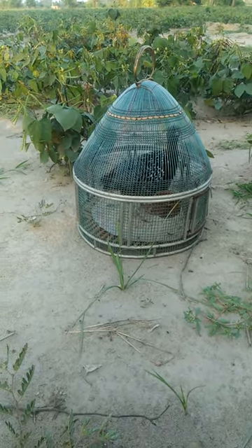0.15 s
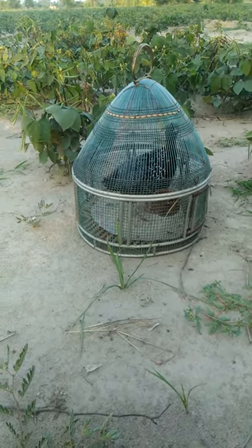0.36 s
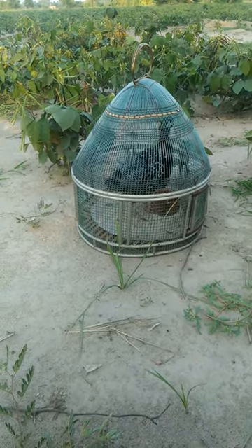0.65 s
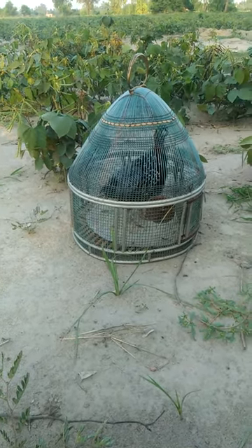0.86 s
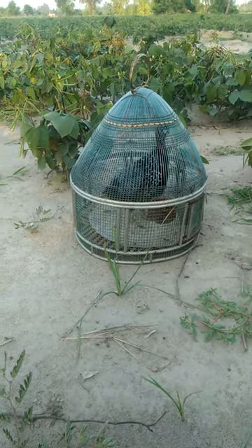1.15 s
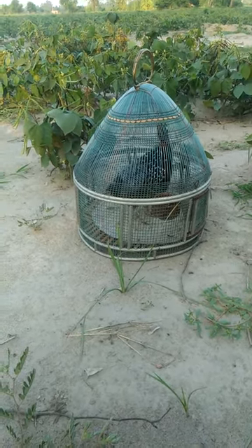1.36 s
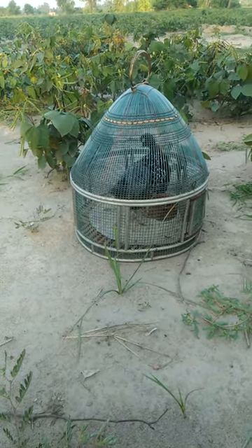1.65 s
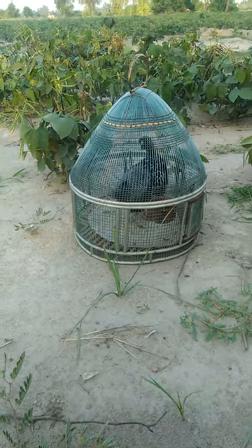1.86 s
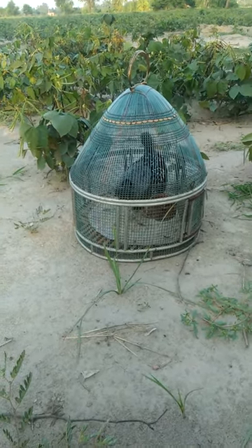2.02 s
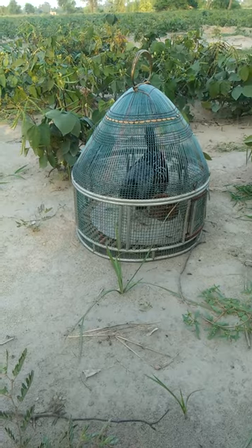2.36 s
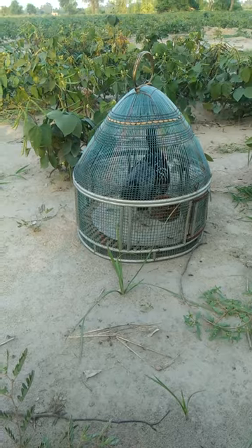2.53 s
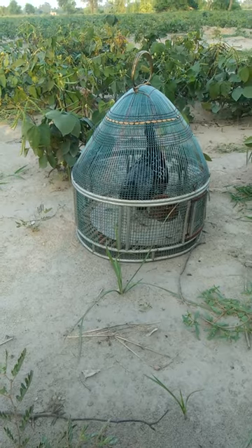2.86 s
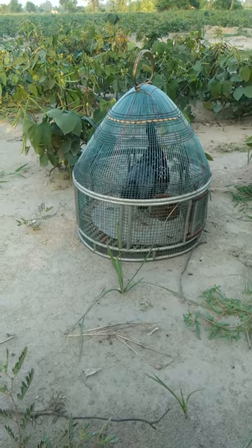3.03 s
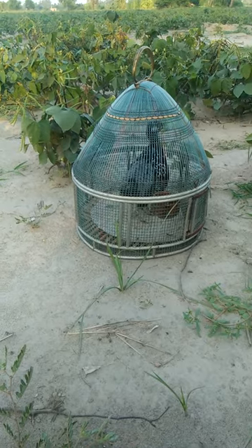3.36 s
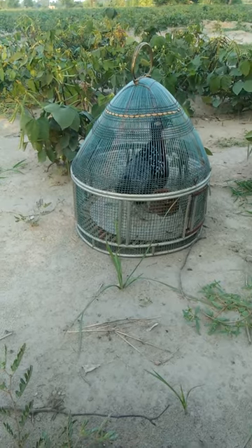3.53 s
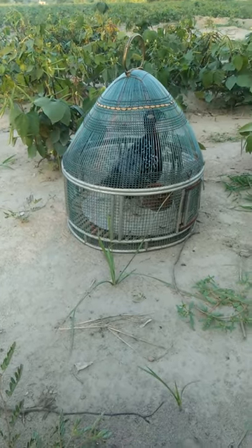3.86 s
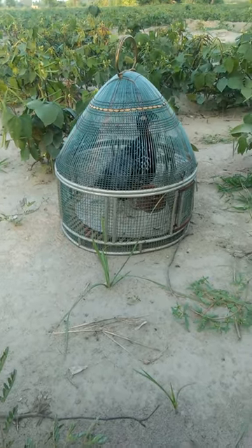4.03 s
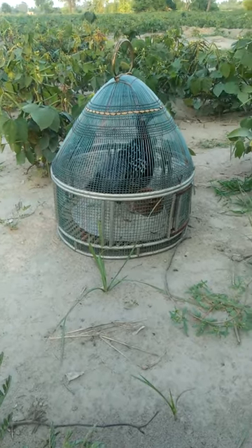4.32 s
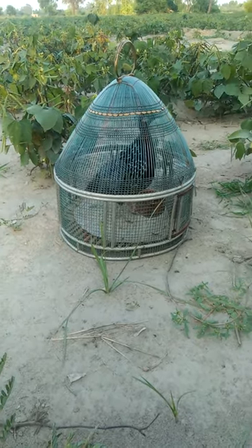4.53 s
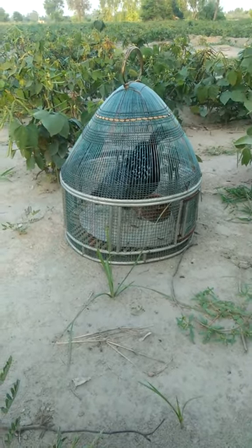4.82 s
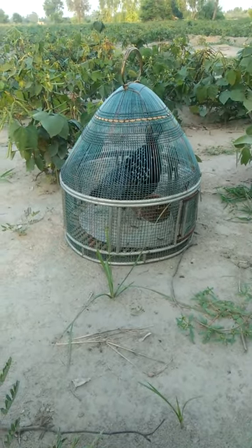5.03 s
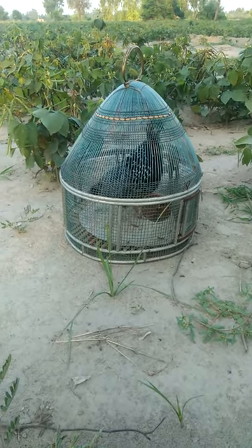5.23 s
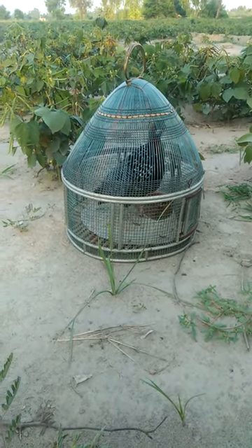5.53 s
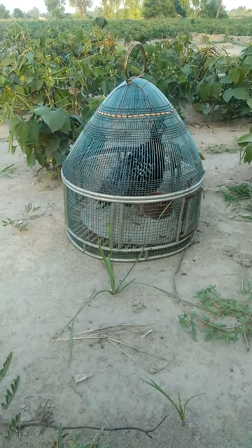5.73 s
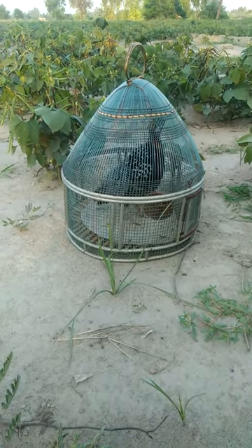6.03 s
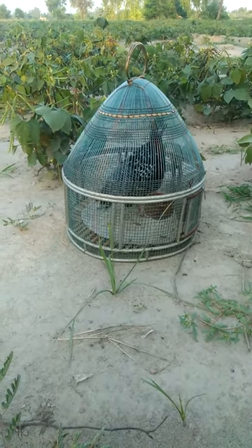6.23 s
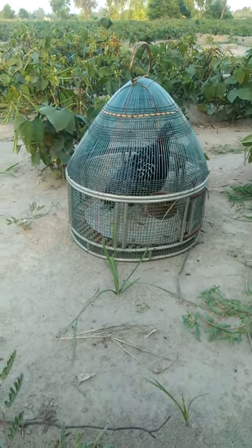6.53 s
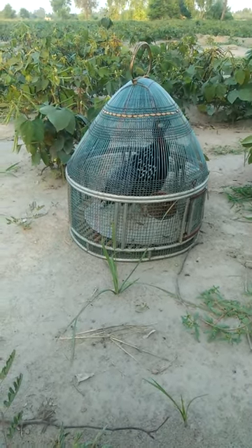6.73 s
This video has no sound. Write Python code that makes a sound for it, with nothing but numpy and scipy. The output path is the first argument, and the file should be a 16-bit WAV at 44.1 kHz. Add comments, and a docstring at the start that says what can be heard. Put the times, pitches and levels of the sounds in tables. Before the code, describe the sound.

Nearly five seconds of soft wind, far cawing and bird peeps, then a very loud raspy game-bird call with brief piercing whistles inside it.

```python
"""A francolin calls near a hand-held phone in an open field: a chik, then four grating notes, two broken by a
whistle. The grating is a train of membrane snaps that rings the throat; the whistle is a near sine with its
octave. Far off a rival calls as throat-filtered noise, crows caw by slow pulses, and small birds and the
rival's faint high whistles pipe as narrow-band noise. Shaped noise makes wind, hiss and rustles; decaying low
sines make handling thuds; sparse echoes answer the near bird."""
import sys
import numpy as np
from scipy import signal
from scipy.fft import rfft, irfft
from scipy.io import wavfile
from scipy.ndimage import uniform_filter1d, minimum_filter1d

SR = 44100
rng = np.random.default_rng(int(sys.argv[2]) if len(sys.argv) > 2 else 0)


def store_wav(level_fs):
    """Save 16-bit WAV to argv[1]."""
    pcm = np.round(np.clip(np.atleast_2d(level_fs), -1, 1) * 32767)
    wavfile.write(sys.argv[1], SR, pcm.T.astype(np.int16))


def makeup_ratio(level_db):
    """Linear amplitude ratio for a level in decibels (20 dB per factor of ten)."""
    decades = np.asarray(level_db, float) / 20
    return 10 ** decades


N = 303408


def evened(x):
    """Normalisation: scales a signal to rms 1."""
    return x / np.sqrt(np.mean(x ** 2) + 1e-20)


def add(mix, s, sound):
    """Superposition: adds a sound to the mix from time s."""
    part = mix[round(s * SR):][:len(sound)]
    part += sound[:len(part)]


def curves(rows):
    """Linear interpolation: start time and one sample-by-sample curve per column after the time."""
    s, *columns = np.transpose(rows)
    t = np.arange(s[0], s[-1], 1 / SR)
    return s[0], [np.interp(t, s, c) for c in columns]


def ramp(t, length):
    """Linear envelope: falls from 1 at t = 0 to 0 after length."""
    return np.clip(1 - t / length, 0, 1)


def coloured(x, points):
    """Spectral filtering: weights x by a curve of (Hz, dB), interpolated over log frequency."""
    hz, db = np.transpose(points)
    f = np.fft.rfftfreq(len(x), 1 / SR)
    gain_db = np.interp(np.log(f + 1), np.log(hz), db)
    return irfft(rfft(x) * makeup_ratio(gain_db), len(x))


def resonate(x, hz, width):
    """Resonance by heterodyne: shifts the curve hz to zero, smooths twice, shifts back; rms 1."""
    turn = np.exp(2j * np.pi * np.cumsum(hz * np.ones(len(x))) / SR)
    r = np.exp(-np.pi * width / SR)
    smoothed = signal.lfilter([1], np.convolve([1, -r], [1, -r]), x / turn)
    return evened((turn * smoothed).real)


def wander(count, size):
    """Slow random modulation: noise averaged over size samples, at rms 1."""
    return evened(uniform_filter1d(rng.standard_normal(count), size))


def pulses(rate, rough, jitter, puff):
    """Pulsed source: snaps at a wavering rate, blended with noise that weakens within each cycle."""
    turns = np.cumsum(rate * (1 + jitter * wander(count=len(rate), size=400))) / SR
    snaps = np.diff(np.floor(turns), prepend=0)
    puffs = (0.87 + np.exp(-(turns % 1) / puff)) * rng.standard_normal(len(rate))
    return np.sqrt(1 - rough) * evened(snaps) + np.sqrt(rough) * evened(puffs)


# Wind on the microphone. Each row: time in seconds, mean level in dB.
WIND = [(0, -56.5), (.25, -69), (1.0, -64), (1.45, -73.5), (1.7, -61), (2.7, -62.5), (3.54, -77),
        (3.95, -61.5), (4.2, -77.5), (4.7, -61.5), (5.05, -65), (5.55, -70), (5.959, -60.5), (6.2, -70),
        (6.88, -65)]
# Spectrum of the wind. Each row: frequency in Hz, relative density in dB per Hz.
WIND_COLOUR = [(12, -60), (20, -13.5), (60, 6.5), (231, -40), (274, -22.5), (370, -33.5), (433, -43.5),
               (600, -38), (780, -67.5), (1320, -120)]
# Spectrum of the field's hiss. Each row: frequency in Hz, relative density in dB per Hz.
HISS_COLOUR = [(59, -32), (100, 1.5), (217, -15.5), (304, -8), (383, -25), (434, -11.5), (513, -18.5),
               (1770, -18), (3180, -31), (6760, -35.5), (8170, -27), (13500, -42), (15000, -43.5)]


def air():
    """Turbulent noise: lumpy low wind on the microphone over the quiet hiss of the field."""
    s, db = np.transpose(WIND)
    gusts_db = np.interp(np.arange(N) / SR, s, db) + 4 * wander(count=N, size=2500)
    wind = evened(coloured(rng.standard_normal(N), WIND_COLOUR)) * makeup_ratio(gusts_db)
    hiss_db = -73.5 + 0.9 * wander(count=N, size=6000)
    hiss = evened(coloured(rng.standard_normal(N), HISS_COLOUR)) * makeup_ratio(hiss_db)
    return wind + hiss


# Rings of the crow's throat. Each row: frequency in Hz at beak factor 1, width in Hz at spread 1,
# relative level in dB at spread 1.
CROW = [(725, 330, -18.5), (1230, 150, -3), (1337, 110, 4.5), (1673, 200, 8.5), (1978, 100, 1),
        (2190, 200, -16.5)]
# Distance dulls the crows. Each row: frequency in Hz, gain in dB.
FAR = [(300, -26.5), (600, 0.5), (2450, -1.5), (2700, -37), (4000, -60)]


def crow(rows, echo, ground, rough, spread):
    """Source and filter: slow pulses ring the throat; a half-cycle echo and a ground bounce fill the gaps."""
    s, (db, rate, beak) = curves(rows)
    drive = pulses(rate, rough, jitter=.003, puff=.9)
    half_cycle = round(SR / rate.mean() / 2)
    drive = drive + echo * np.roll(drive, half_cycle) + ground * np.roll(drive, 122)
    rings = np.zeros(len(drive))
    for k, (hz, width, ring_db) in enumerate(CROW):
        # neighbouring rings alternate in sign
        rings += (-1) ** k * makeup_ratio(ring_db / np.sqrt(spread)) * resonate(drive, beak * hz, width * spread)
    return s, makeup_ratio(db) * evened(coloured(rings, FAR))


# Short caws. Each row: start in seconds, nominal length in seconds (the tail runs on to 1.6 times it),
# level in dB, beak opening as a factor on the rings before the arch.
CAWS = [(0, 0.19, -71, 1.1), (0.686, .19, -63.5, 1.045), (2.369, 0.23, -69.5, 1.06),
        (2.787, 0.33, -63, 1.08), (3.043, 0.25, -69.5, 1.1), (3.225, 0.2, -61.5, 1.08),
        (3.647, 0.25, -64.5, 1.05), (3.9, 0.37, -66.5, 0.94), (4.078, 0.2, -65, .99),
        (4.533, 0.22, -62, 0.96), (4.998, 0.17, -61, 0.99), (5.257, .34, -53.5, 1.134),
        (5.723, 0.25, -52, 1.19), (6.106, 0.158, -67, 1.06), (6.222, .24, -52.5, 1.17),
        (6.704, 0.22, -54, 1.15)]


def caw(s, length, db, beak):
    """Formant glide: pitch and beak arch up quickly and sink; the far trees leave a short tail."""
    # share of length, level in dB, arch as a factor on pitch and beak
    shape = [(0, -16, .9), (.12, -3, .96), (.4, 0, 1.02), (.85, -4, .95), (1.05, -12, .93), (1.6, -26, .93)]
    rest_hz = 72.7  # pulse rate with the beak at rest
    rows = []
    for u, drop_db, arch in shape:
        rows.append((s + u * length, db + drop_db, rest_hz * np.sqrt(beak) * arch, beak * arch))
    return crow(rows, echo=.85, ground=.15, rough=.3, spread=1.6)


# Faint piping of far birds. Each row: start in seconds, end in seconds, first pitch in Hz,
# last pitch in Hz, level in dB.
PIPES = [(.22, .36, 1850, 1800, -76), (.39, .45, 1750, 1750, -76), (.2, .6, 1250, 1200, -78),
         (.41, .56, 1000, 990, -75), (.03, .55, 350, 330, -75), (.95, 1.25, 480, 470, -78),
         (.56, .64, 6450, 6450, -74), (1.14, 1.28, 6500, 6500, -76), (1.38, 1.48, 6700, 6700, -74),
         (1.94, 2.02, 6750, 6700, -76), (3.8, 3.97, 2950, 2900, -88), (4.2, 4.35, 2900, 2800, -90),
         (4.33, 4.42, 1200, 1050, -80), (5.27, 5.33, 3500, 4500, -76), (5.36, 5.39, 5750, 5750, -72)]


def pipe(start, end, start_hz, end_hz, db):
    """Narrow-band noise: a gliding resonance makes a faint fuzzy whistle."""
    count = round((end - start) * SR)
    glide_hz = np.linspace(start_hz, end_hz, count)
    fuzzy = resonate(rng.standard_normal(count), glide_hz, 60 + 0.0081 * start_hz)
    return start, makeup_ratio(db) * fuzzy * signal.windows.tukey(count, .4)


# Throat rings above the lowest, with the neck at rest. Each row: frequency in Hz, width in Hz,
# relative level in dB.
THROAT = [(3896, 180, 1), (4510, 430, 2.5), (4955, 170, -10), (5670, 100, -1.5), (6307, 90, -2),
          (6920, 210, -3.5), (7453, 240, -9.5)]


def throat(drive, low_hz, syrinx_hz):
    """Coupled resonances: rings sound strongest near the syrinx ring, partly follow the lowest, and waver."""
    rings = makeup_ratio(2.5) * resonate(drive, low_hz, 150) + makeup_ratio(-2) * resonate(drive, syrinx_hz, 450)
    stretch = (low_hz / 3010) ** .5
    count = len(drive)
    for k, (hz, width, db) in enumerate(THROAT):
        detuned = (hz * stretch - syrinx_hz) / 1500
        drift = 1 + .007 * wander(count, size=900)
        swell_db = 2 * wander(count, size=600)
        level = makeup_ratio(db + swell_db - 2.0 * detuned ** 2)
        rings += (-1) ** k * level * resonate(drive, hz * stretch * drift, width)
    return evened(rings)


# Notes of the distant rival. Each row: start in seconds, length in seconds, peak of the level curve in dB.
RIVAL = [(0.544, .11, -81), (0.935, 0.23, -61), (1.125, 0.62, -64), (1.24, 0.25, -61.5), (1.732, 0.17, -67),
         (1.901, 0.29, -66.5)]
# Spectrum of the rival's rasp. Each row: frequency in Hz, relative density in dB per Hz.
RIVAL_COLOUR = [(1470, -50), (2500, -8), (3220, -1.5), (3670, 1), (4030, 2.5), (5330, 3), (6700, -1.5),
                (7310, -7), (8430, 3.5), (11000, -55), (14300, -60), (22000, -120)]


def rival(s, length, peak_db):
    """Loss of pulse detail with distance: throat-filtered noise gives the same kind of call as a soft rasp."""
    u = np.arange(0, length, 1 / SR) / length
    db = peak_db + np.interp(u, [0, 0.42, 1], [-10, 0, -17])
    noise = rng.standard_normal(len(db))
    voice = evened(coloured(noise, RIVAL_COLOUR)) + makeup_ratio(-7) * throat(noise, low_hz=3150, syrinx_hz=5200)
    return s, makeup_ratio(db) * evened(voice) * signal.windows.tukey(len(db), .2)


# The rattle's rate and beak dip early, recover and then sag. Each row: time in seconds,
# pulse rate in Hz, beak opening as a factor on the rings.
RATTLE_VOICE = [(1.07, 72, .92), (1.15, 74.3, .99), (1.3, 71.5, .97), (1.48, 72.6, 1.03), (1.8, 71.8, 1.0),
                (2.21, 68, .965)]


def rattle():
    """Pulse train of slow steady beats: one long crow call rises fast, holds while tiring, and fades."""
    # start, then rise, hold and fall in seconds
    corners = 1.07 + np.cumsum([0, .08, .99, .05])
    at, rate, beak = np.transpose(RATTLE_VOICE)
    s = np.union1d(corners, np.clip(at, corners[0], corners[-1]))
    db = -50.5 + np.interp(s, corners, [-20, 0, -3, -20])
    rows = np.transpose([s, db, np.interp(s, at, rate), np.interp(s, at, beak)])
    return crow(rows, echo=.6, ground=.5, rough=.28, spread=1)


# Thuds on the phone. Each row: start in seconds, level in dB, frequency in Hz.
THUDS = [(1.431, -49.5, 277), (1.541, -52, 144), (2.096, -50, 116), (2.17, -51.5, 115), (3.576, -39.5, 170),
         (3.962, -45.5, 130), (3.991, -40, 111.2)]


def thud(s, db, hz):
    """Damped oscillation: a couple of low cycles, a weak after-ring and a dull edge."""
    t = np.arange(0, .08, 1 / SR)
    decay = np.exp(-(t / 0.0068) ** 2) + 0.082 * np.exp(-t / 0.051)
    push = np.sin(2 * np.pi * hz * t) * decay
    edge = resonate(rng.standard_normal(len(t)), 280, 400) * np.exp(-t / 0.021)
    return s, makeup_ratio(db) * (push + 0.14 * edge)


# Rustles of hand or cloth. Each row: start in seconds, length in seconds, level in dB before the fades.
RUSTLES = [(2.1, 0.023, -74), (2.151, 0.057, -63), (2.39, 0.037, -75), (2.963, 0.1, -71.5),
           (3.21, .02, -80), (3.326, 0.052, -72), (3.567, 0.085, -71)]


def rustle(s, length, db):
    """Friction noise: a short bright hiss that swells and fades."""
    count = round(length * SR)
    hiss = coloured(rng.standard_normal(count), [(2500, -16), (6000, -6), (8000, 8), (14000, -3)])
    return s, makeup_ratio(db) * evened(hiss) * np.hanning(count)


# Grating notes of the near bird. Each row: start in seconds, length in seconds, effort in dB,
# lowest throat ring at the start in Hz, its rise before the closing in Hz, syrinx ring at the start in Hz,
# the ring it heads for in Hz, closing time in seconds.
NOTES = [(4.916, 0.045, -17.5, 2876, 202.5, 4400, 6170, .005),
         (4.99, 0.023, -7.5, 3294, 0.5, 5500, 5000, 0.02),
         (5.4451, 0.15, -9.5, 3008, 450.5, 5880, 6550, 0.031),
         (5.807, 0.22, -11, 2967, 68, 4560, 6630, 0.051),
         (6.325, 0.11, -10.5, 2958, 63, 4700, 6140, 0.0425),
         (6.4847, 0.2, -11, 2967, 40, 4500, 6640, 0.063)]
# Breath around the rings. Each row: frequency in Hz, relative density in dB per Hz.
BREATH = [(59, -54.5), (100, -30.5), (2180, -25.5), (2370, -18.5), (2990, -3.5), (3610, -5.5), (4640, -7.5),
          (5040, -11), (6480, -12.5), (8340, -20.5), (10300, -20.5), (14100, -31.5), (15000, -71.5)]
# Faint high rings. Each row: frequency in Hz, width in Hz, level in dB before the lift at the start.
TREBLE = [(9260, 700, -29), (10540, 500, -28), (11900, 400, -29.5), (13920, 500, -31.5)]
ATTACK_S, ATTACK_DB, RELEASE_S, RELEASE_DB = 0.0095, -28, 0.028, -33
OPENING_S, CLOSED_HZ, CLOSING_LIFT_HZ = .035, 3900, 201  # the beak opens gradually and shuts at the end
SNAPS_HZ, SAG_HZ_PER_S, JITTER = 261.3, 170, .009  # snap rate at the start, its sag, its relative waver
BEAK_SHUT_HZ, BEAK_OPEN_HZ, BEAK_SHUT_DB, BEAK_OPEN_DB = 1500, 2130, -3, -32  # low ring of the beak
HUSH_DB, HUSH_IN_S, HUSH_OUT_S = -28, 0.0093, 0.0039  # the rasp fades under a whistle and snaps back


def rasp(s, length, effort_db, low_hz, rise_hz, first_hz, top_hz, closing):
    """Source and filter: fast snaps ring the throat, breath fills in, the closing beak adds a low ring."""
    t = np.arange(0, length, 1 / SR)
    left = length - t
    shut = np.exp(-t / OPENING_S)
    closed = ramp(left, closing)

    db = effort_db + ATTACK_DB * ramp(t, ATTACK_S) + RELEASE_DB * ramp(left, RELEASE_S) ** 1.57
    for start, span, *_ in WHISTLES:
        fade_in, fade_out = (s + t - start) / HUSH_IN_S, (start + span - s - t) / HUSH_OUT_S
        db = db + HUSH_DB * np.clip(np.minimum(fade_in, fade_out), 0, 1)

    syrinx_hz = (1 - closed) * (top_hz - (top_hz - first_hz) * shut) + closed * CLOSED_HZ
    low_hz = low_hz + rise_hz * t / length * (1 - closed) + CLOSING_LIFT_HZ * closed
    beak = np.maximum(shut ** 2, np.sqrt(closed) * 0.579)  # 1 is shut
    beak_db = BEAK_OPEN_DB + (BEAK_SHUT_DB - BEAK_OPEN_DB) * beak
    beak_hz = BEAK_OPEN_HZ + (BEAK_SHUT_HZ - BEAK_OPEN_HZ) * beak ** 2

    rate = SNAPS_HZ - SAG_HZ_PER_S * t
    drive = pulses(rate, rough=.17, jitter=JITTER, puff=1.0)
    breath = evened(coloured(pulses(rate, rough=0.89, jitter=JITTER, puff=0.6), BREATH))
    voice = throat(drive, low_hz, syrinx_hz) + makeup_ratio(-6 - 5 * closed) * breath
    for hz, width, ring_db in TREBLE:
        level = makeup_ratio(ring_db + 11 * shut + 1.9 * wander(count=len(t), size=900))
        voice += level * resonate(drive, hz, width)
    return s, makeup_ratio(db) * (evened(voice) + makeup_ratio(beak_db) * resonate(drive, beak_hz, 560))


# Strength of the octave by pitch. Each row: pitch in Hz, level in dB relative to the fundamental.
OCTAVE = [(2000, -26), (4200, -10.5), (6900, -16.5), (7250, -22.5)]


def tone(hz, db):
    """Self-sustained oscillation: the syrinx locks into a near sine with its octave and a thin breath."""
    phase = 2 * np.pi * np.cumsum(hz) / SR
    octave = makeup_ratio(np.interp(hz, *np.transpose(OCTAVE))) * np.sin(2 * phase)
    breath = makeup_ratio(-22.5) * evened(coloured(rng.standard_normal(len(hz)), BREATH))
    return makeup_ratio(db) * (np.sqrt(2) * (np.sin(phase) + octave) + breath)


# Two tones that open the chik, one held and one dropping, each a list of its own.
# Each row: time in seconds, pitch in Hz, level in dB.
CHIK = [
    [(4.918, 3900, -40), (4.921, 4000, -23), (4.925, 4170, -23), (4.927, 4220, -9), (4.931, 4170, -8),
     (4.934, 4150, -18), (4.937, 4400, -12), (4.944, 4000, -30)],
    [(4.931, 3115, -27.5), (4.936, 2154, -15.5), (4.939, 1560, -36), (4.948, 1555, -27.5),
     (4.951, 2260, -18.5)],
]


def chik(rows):
    """Frequency modulation: one tone follows its pitch and level curves."""
    s, (hz, db) = curves(rows)
    return s, tone(hz, db)


# Whistles that hush the rasp. Each row: start in seconds, length in seconds, top pitch in Hz,
# last pitch before the closing jump in Hz, level in dB, depth of the two dips in dB.
WHISTLES = [(4.9498, .0498, 7240, 6500, -6.5, -11), (5.947, .0355, 6910, 6650, -8, -10),
            (6.5635, .023, 7020, 6950, -8, -2)]
ENTRY_HZ, ARCH_POWER, EDGE_S, EDGE_DB = 6810, 2.2, 0.00077, -11
SNAP_UP_HZ, SNAP_DOWN_HZ, SNAP_S = 1000, 4000, .0005  # the whistle is entered and left by a jump
FIRST_DIP_S, FIRST_DIP_WIDTH_S, MIDDLE_DB = .006, .0014, -2.5
LAST_DIP_SHARE, SAG_SHARE = .74, .3  # shares of the length
RECOVERY_S = .003


def whistle(s, length, top_hz, last_hz, db, dip_db):
    """Gliding oscillation: pitch arches over; the level dips after the entry, sags and recovers at the end."""
    t = np.arange(0, length, 1 / SR)
    side = 2 * t / length - 1  # -1 at the start, 1 at the end
    low = LAST_DIP_SHARE * length
    edge_hz = np.where(side < 0, ENTRY_HZ, last_hz)
    hz = top_hz - (top_hz - edge_hz) * abs(side) ** ARCH_POWER
    hz = hz - SNAP_UP_HZ * np.exp(-t / SNAP_S) - SNAP_DOWN_HZ * np.exp((t - length) / SNAP_S)
    sag = np.where(t < low, ramp(low - t, SAG_SHARE * length) ** 2, ramp(t - low, RECOVERY_S))
    dips = np.exp(-((t - FIRST_DIP_S) / FIRST_DIP_WIDTH_S) ** 2) + sag
    middle = (1 - ramp(t, FIRST_DIP_S)) * ramp(np.maximum(t - low, 0), RECOVERY_S)
    edges = ramp(t, EDGE_S) + ramp(length - t, EDGE_S)
    return s, tone(hz, db + dip_db * dips + MIDDLE_DB * middle + EDGE_DB * edges)


# A brief high ring opens the first grating note after the chik. The one row: start in seconds,
# frequency in Hz, peak level in dB, length in seconds.
ONSET_RING = (5.449, 12000, -15, .012)


def ring(s, hz, db, length):
    """Windowed sinusoid: a few milliseconds of pure tone."""
    t = np.arange(0, length, 1 / SR)
    return s, makeup_ratio(db) * np.sin(2 * np.pi * hz * t) * np.hanning(len(t))


# Sound returning from the bushes and far trees. Each row: delay in seconds, relative level in dB.
FIELD = [(.004, 6.5), (0.02, -18), (0.038, -20), (.2, -29.5), (.25, -35), (.31, -48), (0.499, -62)]
# Spectrum of the returning sound. Each row: frequency in Hz, relative gain in dB.
FIELD_COLOUR = [(1000, 2), (2500, -10.5), (3100, -7), (4200, -14.5), (5200, -8), (6300, 3), (7200, -3.5),
                (8500, 2.5), (14000, -13)]


def field(x):
    """Sparse reverberation: convolves x with taps of random sign, one in every 20 samples."""
    s, db = np.transpose(FIELD)
    at = np.arange(round(s[0] * SR), round(s[-1] * SR), 20)
    signs = rng.choice([-1., 1.], len(at))
    taps = np.zeros(SR)
    taps[at + rng.integers(0, 20, len(at))] = signs * makeup_ratio(np.interp(at / SR, s, db))
    return makeup_ratio(-33.5) * signal.fftconvolve(x, coloured(taps, FIELD_COLOUR))[:N]


def scene():
    """Superposition: the near bird with its echoes over the distant life of the field."""
    around, bird = air(), np.zeros(N)
    for play, table in ((caw, CAWS), (pipe, PIPES), (rival, RIVAL), (thud, THUDS), (rustle, RUSTLES)):
        for row in table:
            add(around, *play(*row))
    add(around, *rattle())
    for play, table in ((rasp, NOTES), (whistle, WHISTLES)):
        for row in table:
            add(bird, *play(*row))
    for rows in CHIK:
        add(bird, *chik(rows))
    add(bird, *ring(*ONSET_RING))
    return np.tile(bird + field(bird) + around, (2, 1))


# Share of moments in which the treble differs between the ears. Each row: frequency in Hz, share from 0 to 1.
APART = [(3500, .001), (5000, 0.061), (7000, 0.16), (9000, 0.28), (14000, 0.23)]


def flicker(x):
    """Decorrelation: patches of treble gain random-phase noise of opposite sign in the two ears."""
    hz, t, z = signal.stft(x, SR, nperseg=1024)
    patch = rng.random((24, len(t) // 4 + 1))
    patch = patch.repeat(22, 0).repeat(4, 1)[:len(hz), :len(t)]
    on = patch < np.interp(hz, *np.transpose(APART))[:, None]
    scrambled = makeup_ratio(-15.5) * on * abs(z) * np.exp(2j * np.pi * rng.random(z.shape))
    side = signal.istft(scrambled, SR, nperseg=1024)[1][:N]
    return np.array([side, -side])


def top_cut(x):
    """Nothing passes above the cut-off."""
    return signal.sosfilt(signal.butter(12, 15620, fs=SR, output="sos"), x)


def record(dry):
    """Nonlinear transduction: a fast limiter, slight distortion, treble mirrored about 8 kHz, a band limit."""
    reach = uniform_filter1d(-minimum_filter1d(-abs(dry[0]), size=21), size=21)  # smoothed local peak
    held = dry / np.maximum(reach / .6, 1) ** .68
    held = held + 0.012 * held ** 2  # a lopsided microphone adds sum and difference tones
    treble = signal.sosfilt(signal.butter(4, 4000, "high", fs=SR, output="sos"), held)
    # multiplying by 16 kHz reflects the treble about 8 kHz
    mirrored = held + makeup_ratio(-19) * treble * np.cos(2 * np.pi * 16000 * np.arange(N) / SR)
    mirrored += flicker(mirrored[0])
    low_pass = signal.firwin(255, 14400, window=("kaiser", 8), fs=SR)
    finished = signal.oaconvolve(mirrored, low_pass[None], "same")
    return top_cut(finished)


dry = scene()
out = record(dry)
store_wav(out)
```